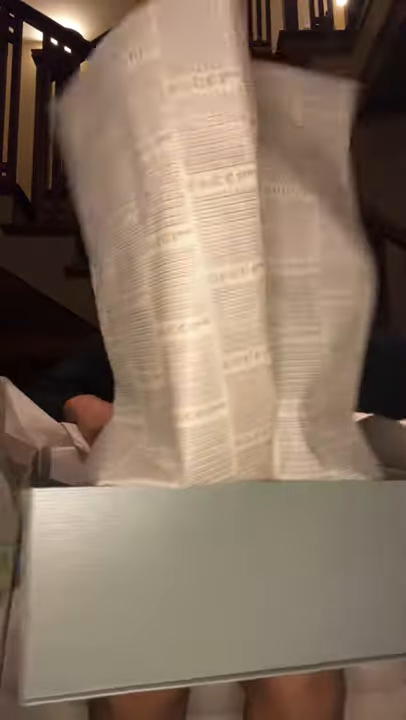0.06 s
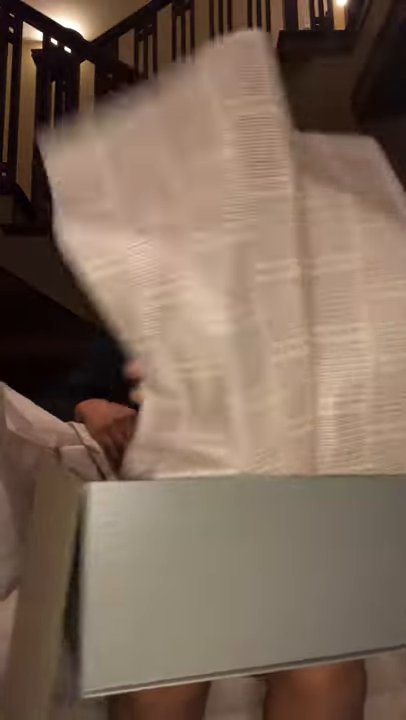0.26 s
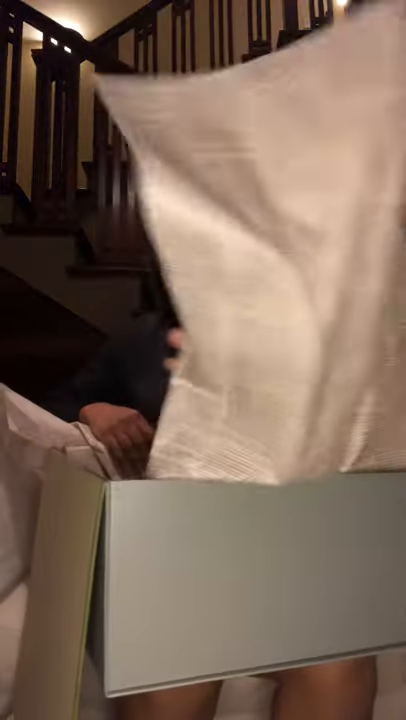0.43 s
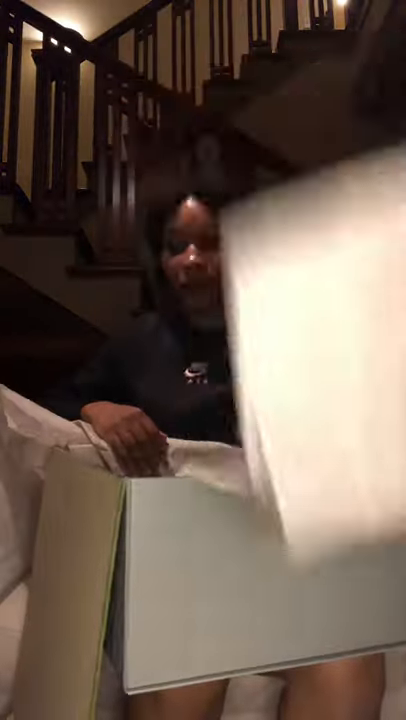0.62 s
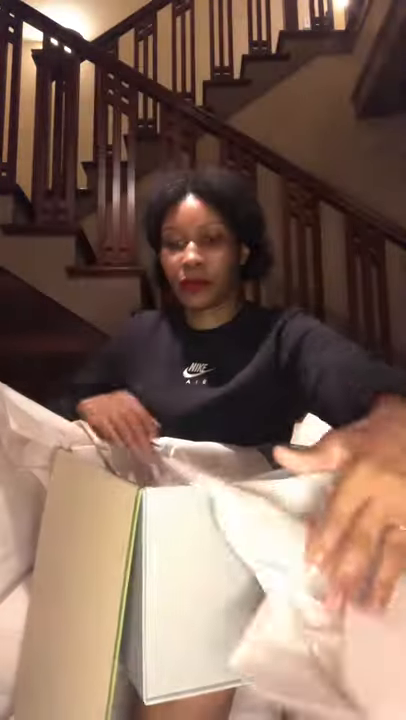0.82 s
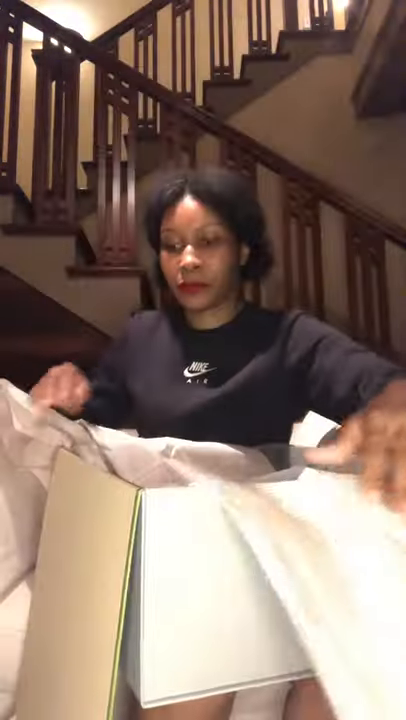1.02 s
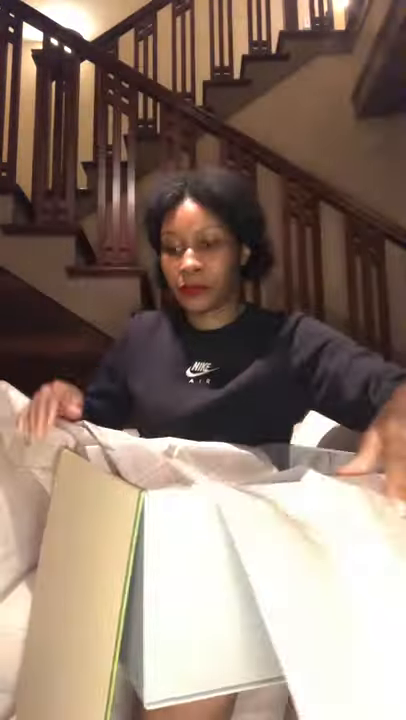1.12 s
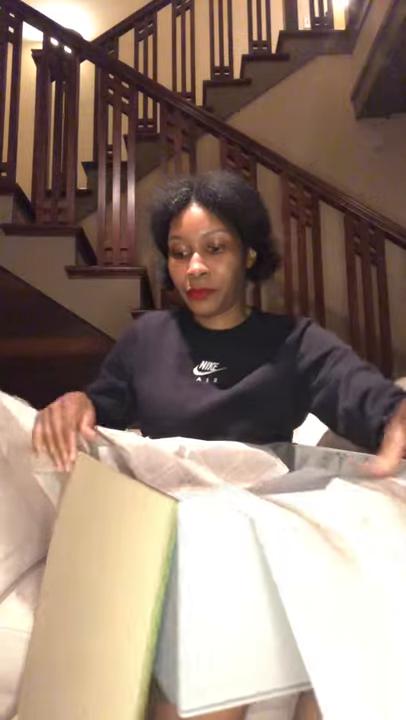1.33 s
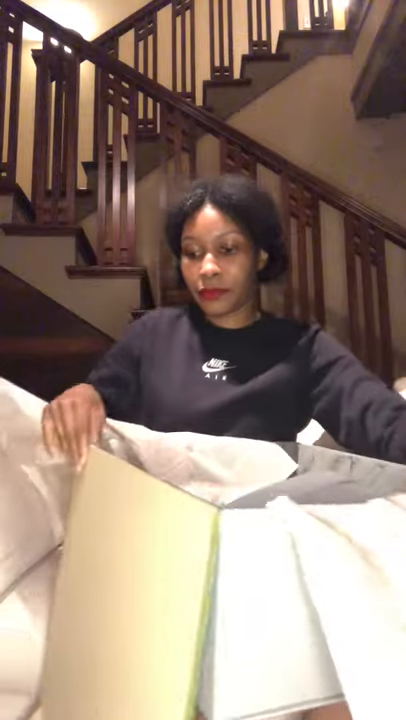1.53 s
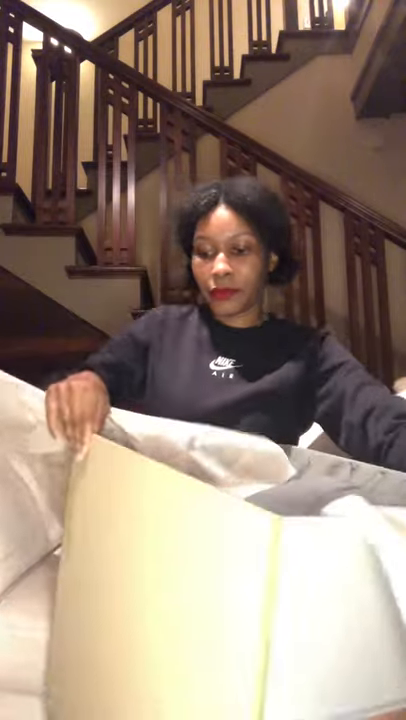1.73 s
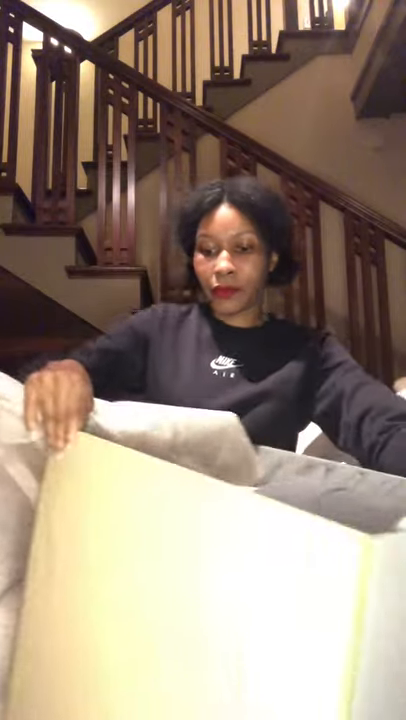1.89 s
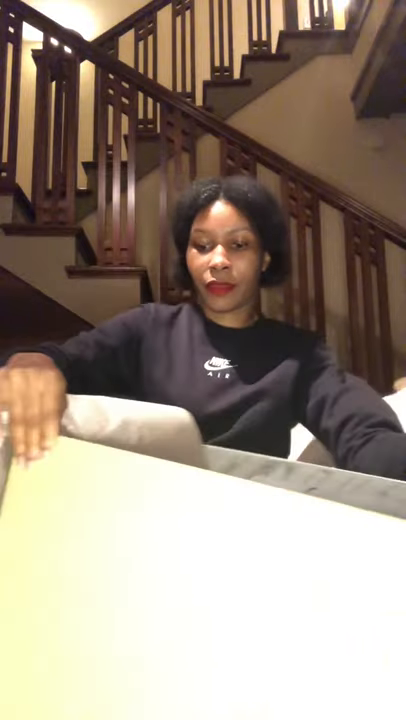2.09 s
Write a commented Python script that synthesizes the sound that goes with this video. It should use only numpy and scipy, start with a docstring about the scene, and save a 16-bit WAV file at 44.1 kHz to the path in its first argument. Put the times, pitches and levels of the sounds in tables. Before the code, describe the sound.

Crisp tissue paper swishes, crackles and snaps while being swept aside, with faint box knocks

```python
"""A sheet of tissue paper is lifted out of a cardboard box, swept aside and pressed down, in a hall.
Sparse creases tick at first and a hand bumps the box as it takes hold of the lid; then the sheet swishes,
its slips drawn as dense random clicks, and crinkles in clumps of tiny buckles while larger creases snap.
Folds pop, fibres tick, knocks return and the flapping pushes a little air, as low noise.
Handling swells again in a second push, then thins out into the quiet noise of the room."""
import sys
import numpy as np
from scipy import signal
from scipy.fft import rfft, irfft
from scipy.io import wavfile

SR = 44100
rng = np.random.default_rng(int(sys.argv[2]) if len(sys.argv) > 2 else 0)


def dump_mix(stems):
    """Bounce the given channels to the path in sys.argv[1] as a 16-bit WAV at rate SR."""
    frames = np.atleast_2d(stems).T  # one column per channel
    limited = np.clip(frames, -1, 1)  # hard clip at full scale
    pcm = np.round(limited * 32767).astype(np.int16)
    wavfile.write(sys.argv[1], SR, pcm)


N = 94815

USUAL_DB = -43  # handling level at which the slip and buckle rates hold

# Low colour of moved air and of contact with the box: (frequency [Hz], relative level [dB])
AIR_COLOUR = [(20, -55), (30, -46), (40, -39), (52, -17.5), (100, -7), (150, -5.5), (220, 0.5), (350, -1),
              (490, -1), (620, -20), (1500, -22), (6000, -67)]


def amp(db):
    """Decibels to gain."""
    return 10 ** (np.asarray(db) / 20)


def unit(x):
    """Scales to rms 1."""
    return x / np.sqrt(np.mean(x ** 2) + 1e-20)


def read_curve(points, hz):
    """Reads a frequency curve on a log-frequency axis."""
    f, value = np.transpose(points)
    return np.interp(np.log(hz + 1), np.log(f + 1), value)


def handling(column):
    """How strongly the sheet is handled at every sample: column 1 for sliding, 2 for fine crinkle."""
    # Handling of the sheet, before layer trims: (time [s], sliding level [dB], crinkle level [dB])
    gesture = [(0, -52, -56), (0.1, -54, -61), (0.19, -53.5, -65), (0.23, -51, -54), (0.24, -40.5, -41),
               (0.259, -44.5, -40), (0.275, -40, -39.5), (0.345, -40.5, -43.5), (0.405, -45, -46.5),
               (0.44, -42.5, -45), (0.474, -44.5, -48), (0.497, -38, -49.5), (0.531, -46, -47.5),
               (0.59, -42, -44), (0.685, -47.5, -47.5), (0.755, -40.5, -44), (0.781, -38.5, -35.5),
               (0.825, -36.5, -31), (0.859, -44, -38.5), (0.901, -47, -44.5), (0.938, -38.5, -34),
               (0.968, -43.5, -41.5), (1.013, -43.5, -38), (1.04, -45.5, -49.5), (1.11, -48.5, -48.5),
               (1.135, -47, -50.5), (1.165, -43, -44), (1.3, -45, -46.5), (1.435, -44, -45.5),
               (1.479, -40, -42.5), (1.57, -38, -35.5), (1.651, -48.5, -52.5), (1.7, -49, -49),
               (1.769, -47.5, -44), (1.81, -49, -47.5), (1.89, -53, -53.5), (1.95, -54.5, -58),
               (2.019, -62.5, -66.5), (2.09, -55.5, -58), (2.15, -56.5, -61)]
    rows = np.array(gesture)
    return np.interp(np.arange(N) / SR, rows[:, 0], rows[:, column])


def mix_in(mix, s, sound):
    """Adds a sound to the mix at a time in seconds."""
    part = mix[max(0, round(s * SR)):][:len(sound)]
    part += sound[:len(part)]


def colour(x, points, size=8192):
    """Causal minimum-phase filter with the given spectrum and unit energy."""
    hz = abs(np.fft.fftfreq(size, 1 / SR))
    log_gain = np.log(amp(read_curve(points, hz)))
    spectrum = np.exp(np.conj(signal.hilbert(log_gain)))
    taps = np.fft.ifft(spectrum).real[:size // 2]
    return signal.fftconvolve(x, taps / np.linalg.norm(taps))[:N]


def wander(rate_hz):
    """Smooth random drift, mostly slower than the given rate, at rms 1."""
    hz = np.fft.rfftfreq(N, 1 / SR)
    slow = rfft(rng.standard_normal(N)) / (1 + (hz / rate_hz) ** 4)
    return unit(irfft(slow, N))


def clicks(rate, spread_db, largest=3.2):
    """Random clicks of uneven size and either sign, as strong on average where sparse as where dense."""
    excess = np.minimum(rng.exponential(1, N), largest)
    size = amp(spread_db * excess) * rng.choice([-1., 1.], N)
    happens = rng.random(N) < rate / SR
    return unit(size * happens / np.sqrt(rate))


def swish(clump_db=2.2, clump_hz=70, hiss_db=-12, tilt_db=2.0, pivot_hz=2100):
    """Paper slides on paper in countless slips, duller or brighter as the contact moves, fewer when gentle."""
    # Colour of sliding paper: (frequency [Hz], relative level [dB])
    slide_colour = [(100, -28), (450, -15.5), (650, -10.5), (1050, -8.5), (1280, -0.5), (1900, 0),
                    (2550, 1), (3000, -3), (5000, -8.5), (8000, -12.5), (16000, -42)]
    slips_per_s, spread_db, growth, trim_db = 4500, 3, .35, -2  # rate at the usual level
    level = handling(column=1)
    rate = slips_per_s * amp(growth * (level - USUAL_DB)) ** 2
    slips = unit(clicks(rate, spread_db) + amp(hiss_db) * rng.standard_normal(N))
    gain = amp(trim_db + level + clump_db * wander(clump_hz))
    sliding = colour(slips * gain, slide_colour)
    low_pass = signal.butter(2, pivot_hz, fs=SR, output="sos")
    dull = signal.sosfiltfilt(low_pass, sliding)
    bright = sliding - dull
    tilt = amp(tilt_db * wander(clump_hz))
    return dull / tilt + bright * tilt


def folds(count=24, size=600):
    """Larger folds of many sizes pop and ring for a few cycles, each at its own pitch, as the sheet moves."""
    folds_per_s, spread_db, trim_db = 420, 4, -9.5  # rate of all folds together
    low_hz, high_hz, cycles = 1240, 7730, 2.94
    t, pops = np.arange(size) / SR, np.zeros(N)
    for place in (np.arange(count) + rng.random(count)) / count:
        hz = low_hz * (high_hz / low_hz) ** (place ** 1.424)  # leans towards low pitches
        age = t * hz / cycles
        pop = np.sin(2 * np.pi * hz * t) * age * np.exp(-2 * age)
        pop /= np.linalg.norm(pop)
        strikes = clicks(folds_per_s / count, spread_db, largest=2.05)
        pops += signal.fftconvolve(strikes, pop)[:N]
    return unit(pops) * amp(trim_db + handling(column=1))


def buckle(size=200):
    """One tiny buckle: a noisy flutter that swells and dies in about a millisecond."""
    age = np.arange(size) / SR / 0.00027  # the swell peaks after 0.27 ms
    flutter = rng.standard_normal(size) * age * np.exp(-age)
    return flutter / np.linalg.norm(flutter)


def crinkle(clump_db=2.0, clump_hz=110, fizz_db=-7, count=12):
    """Many facets of the sheet buckle in clumps over a fine fizz; harder handling brings more buckles."""
    # Colour of fine crinkling: (frequency [Hz], relative level [dB])
    crinkle_colour = [(200, -25), (950, -21), (1400, -5), (3000, -4.5), (5500, -1), (7700, 0), (8500, -4.5),
                      (12000, -6), (16000, -15.5)]
    buckles_per_s, spread_db, growth, trim_db = 1200, 3.5, .55, -0.5  # rate at the usual level
    level = handling(column=2)
    rate = buckles_per_s * amp(growth * (level - USUAL_DB)) ** 2 / count
    facets = np.zeros(N)
    for _ in range(count):  # each group of facets has its own flutter
        facets += np.convolve(clicks(rate, spread_db), buckle())[:N]
    grains = unit(unit(facets) + amp(fizz_db) * rng.standard_normal(N))
    gain = amp(trim_db + level + clump_db * wander(clump_hz))
    return colour(grains * gain, crinkle_colour)


def fibres():
    """Single fibres give sparse, needle-fine ticks at the very top, riding on the crinkle."""
    # Colour of a fibre tick: (frequency [Hz], relative level [dB])
    fibre_colour = [(1500, -49), (5000, -11), (8500, -6), (12000, -1.5), (16000, -4)]
    fibres_per_s, spread_db, trim_db = 110, 5, -12.5
    ticks = clicks(fibres_per_s, spread_db, largest=1.9)
    return colour(ticks * amp(trim_db + handling(column=2)), fibre_colour)


def flap(gust_db=1.0, gust_hz=30):
    """The moving sheet pushes air and drums softly on the box: low noise in uneven gusts."""
    # Low flutter of the sheet: (time [s], level [dB])
    flutter_level = [(0, -61), (.1, -60.5), (.2, -67), (.27, -50), (.35, -56), (.45, -53.5), (.68, -56),
                     (.82, -48), (.9, -58), (1.0, -55), (1.12, -58.5), (1.18, -52.5), (1.38, -57),
                     (1.48, -51.5), (1.62, -51.5), (1.7, -59), (1.79, -54), (1.9, -67), (2.15, -64.5)]
    level = np.interp(np.arange(N) / SR, *np.transpose(flutter_level)) + gust_db * wander(gust_hz)
    return colour(rng.standard_normal(N) * amp(level), AIR_COLOUR)


def room_noise(level_db=-62.5):
    """Steady, quiet noise of the room, weighted to the lows."""
    # Colour of the room: (frequency [Hz], relative level [dB])
    room_colour = [(20, -53), (30, -31), (40, -28), (55, -2), (200, -5.5), (450, -15.5), (700, -8),
                   (2000, -16.5), (16000, -28)]
    return amp(level_db) * colour(rng.standard_normal(N), room_colour)


def snaps(spike_db=4.5, width=0.52, ring=0.89, size=1000):
    """A crease gives way in a run of sharp ticks lasting milliseconds, and the facet beside it rings."""
    # Creases that snap through: (time [s], level [dB], length [s], sharp top against that level [dB],
    # ring of the facet against that level [dB], facet pitch [Hz]); levels are before the trims below
    creases = [(0.015, -48.5, 0.0012, -8, 4.5, 3700), (0.0406, -37.5, 0.0026, -3, -9.5, 2290),
               (0.062, -49, 0.003, -4, -9, 1270), (0.083, -49, 0.001, 4, -12, 3010),
               (0.091, -43.5, 0.0028, -7, -1, 4200), (0.0982, -45.5, 0.00061, 2, 2, 1760),
               (0.113, -46.5, 0.0018, -8, 0, 1290), (0.135, -51, 0.003, -3, 4, 2110),
               (0.163, -51, 0.0015, -5, 0, 4000), (0.196, -51, 0.00081, 3, -8, 2490),
               (0.213, -49.5, 0.003, -5, 2.5, 2680), (0.2265, -52, 0.00082, 5, -15, 2500),
               (0.2353, -41, 0.0015, 5.5, -9, 2070), (0.266, -29.5, 0.0031, -2, -17, 3570),
               (0.279, -31, 0.0018, -4, -4.5, 2250), (0.307, -32, 0.001, -5, -14, 2090),
               (0.315, -36.5, 0.0027, 2, -10, 2340), (0.323, -38.5, 0.0028, 0, -1, 1810),
               (0.331, -34.5, 0.001, 1, -10, 4070), (0.3508, -30.5, 0.001, -14, -1.5, 2000),
               (0.3548, -37, 0.002, 4, -4, 1440), (0.3626, -34, 0.0012, 5.5, -3, 2360),
               (0.421, -36, 0.0015, 5.5, -11, 1380), (0.4402, -32.5, 0.0023, -5, -8, 1730),
               (0.447, -33.5, 0.00089, -0.5, -6, 1980), (0.498, -42, 0.0069, -2, 2.5, 2290),
               (0.5905, -38.5, 0.0021, 3, -7, 1970), (0.649, -38.5, 0.0041, -10, -3, 1360),
               (0.6585, -37.5, 0.001, 2, -8, 4050), (0.695, -41, 0.0019, 2, -7, 3970),
               (0.7184, -33.5, 0.0016, -1, -5, 1600), (0.7251, -36, 0.0013, 1, -2, 3900),
               (0.737, -38.5, 0.003, 1, 5.5, 2450), (0.7555, -39, 0.002, 0, -7, 3000),
               (0.7712, -33.5, 0.0018, -6, -1, 4460), (0.7744, -32, 0.00082, -3, -9, 1710),
               (0.811, -34, 0.002, -1, -12, 3830), (0.845, -33.5, 0.0029, -14, -10, 3250),
               (0.877, -37, 0.004, -14, -1.5, 1800), (0.911, -33, 0.001, -3, -17, 1830),
               (0.933, -30.5, 0.0021, 1, -9, 2480), (1.018, -37.5, 0.0035, -9, -4.5, 1420),
               (1.054, -32.5, 0.0035, -11, -6.5, 1430), (1.072, -39.5, 0.0057, -10, -1.5, 2480),
               (1.101, -34, 0.0013, -18, -4, 2300), (1.1093, -37, 0.0064, -7, -4.5, 2180),
               (1.259, -41.5, 0.0055, 1.5, -13, 4290), (1.417, -42.5, 0.0015, 0, 4.5, 2060),
               (1.437, -38, 0.0013, -3, -6, 2600), (1.4706, -28.5, 0.0013, -3, -5, 2440),
               (1.4813, -33.5, 0.0057, -1, -3, 2550), (1.508, -33.5, 0.001, 1, -10, 3490),
               (1.5226, -33, 0.0015, -1, -9, 2130), (1.552, -34, 0.0018, 1, -6, 2400),
               (1.619, -37.5, 0.0011, -9, -5, 2310), (1.7177, -41, 0.0028, -13, -5, 2160),
               (1.767, -40, 0.0067, -1, -9, 2240), (1.7927, -37.5, 0.0038, 1, -10, 2050),
               (1.8054, -40.5, 0.0047, 0, -11, 1980), (1.8368, -37, 0.003, 2, -1.5, 2110),
               (1.851, -39, 0.0029, -6, -14, 4200), (1.879, -38, 0.0013, -5, -10, 2240),
               (1.905, -48, 0.00085, -10, -2, 2300), (1.9125, -46.5, 0.0028, -5, -1, 2720),
               (1.989, -46.5, 0.0025, -6, -2, 1720), (2.047, -50, 0.0022, -6, 0, 2400),
               (2.069, -42, 0.0015, -3, -8, 4220), (2.077, -51, 0.001, -8, 0, 2700),
               (2.105, -51, 0.0018, -13, -8, 2610)]
    # Colours of crack, sharp top, flexing body and ringing facet: (frequency [Hz], relative level [dB])
    crack_colour = [(300, -39), (1000, -18), (3000, -1.5), (5000, -1), (7600, 1), (9000, -10),
                    (16000, -22.5)]
    top_colour = [(1000, -50), (6000, -12), (8600, 0.5), (12000, 1.5), (16000, -2.5)]
    body_colour = [(200, -6), (950, -2), (1300, 11.5), (2500, 12), (3500, -6.5), (8000, -22)]
    facet_colour = [(300, -32), (950, -20), (1250, 2), (4500, 0), (16000, -0.5)]
    treble_db, body_db, facet_gain = 1, -3, 0.8
    facet_damping_hz = 375  # decay rate divided by pi

    crack, top, body, facets = np.zeros((4, N))
    t = (np.arange(size) - size // 2) / SR  # centred on the snap
    for s, db, length, top_db, ring_db, hz in creases:
        ticks, fine, sizes, flex = rng.standard_normal((4, size))
        half = width * length
        run = np.exp(-abs(t / half) ** 1.64 / 2)
        swell = np.exp(-abs(t / (ring * half)) ** 1.8 / 2)
        uneven = unit(run * amp(spike_db * sizes))
        spikes = amp(db) * uneven * np.sqrt(np.mean(run ** 2))
        age = np.maximum(t + half, 0) * np.pi * facet_damping_hz
        facet = age * np.exp(-age) * np.sin(2 * np.pi * (hz * t + rng.random()))
        strength = amp(db + ring_db) * np.sqrt(np.mean(swell ** 2))
        start = s + t[0]
        mix_in(crack, start, spikes * np.sign(ticks))
        mix_in(top, start, amp(top_db) * spikes * np.sign(fine))
        mix_in(body, start, strength * unit(swell * flex))
        mix_in(facets, start, strength * unit(facet))
    treble = amp(treble_db) * (colour(crack, crack_colour) + colour(top, top_colour))
    flexing = amp(body_db) * colour(body, body_colour)
    return treble + flexing + facet_gain * colour(facets, facet_colour)


def bumps(size=4000):
    """A short push knocks a cardboard panel, which gives a damped thud with a dull scuff."""
    # Knocks of hand and sheet on the box: (time [s], level [dB], pitch [Hz], decay [s])
    knocks = [(.096, -46.5, 152, 0.011), (.343, -47, 130, 0.029), (.493, -45, 440, 0.024),
              (1.451, -47, 308, .008), (1.487, -44.5, 255, 0.012), (1.5, -45, 129.4, 0.022),
              (1.59, -47, 149, 0.011), (1.623, -49, 225, .026), (1.644, -46, 310, 0.011),
              (1.655, -49, 188, 0.014), (1.716, -41, 484, 0.0052), (1.73, -43, 164, .012),
              (1.849, -44.5, 381, 0.013), (1.859, -51, 164, 0.0088)]
    rise_s, scuff_gain, contact_s, contact_db = 0.0014, .3, 0.00072, 0.5
    thuds, contacts = np.zeros((2, N))
    t = np.arange(size) / SR
    age = t / contact_s
    push = amp(contact_db) * age * (1 - age / 2) * np.exp(-age)
    for s, db, hz, decay in knocks:
        shape = np.minimum(t / rise_s, 1) * np.exp(-t / decay)
        scuff = scuff_gain * shape * rng.standard_normal(size)
        mix_in(thuds, s, amp(db) * shape * np.sin(2 * np.pi * hz * t))
        mix_in(contacts, s, amp(db) * (push + scuff))
    return thuds + colour(contacts, AIR_COLOUR)


def echo(size=22050):
    """Quick reflections off the box, then the short tail of the hall, for one position of the sheet."""
    # Reverberation of the hall: (frequency [Hz], time to fall 60 dB [s])
    hall_decay = [(100, 0.55), (1500, 0.68), (6000, 0.49), (16000, 0.15)]
    tail_db, early_db, early_decay_s = -12.5, -8.5, 0.0057
    t = np.arange(size) / SR
    reflections = rng.standard_normal(size) * (rng.random(size) < 2000 / SR)  # about 2000 per second
    early = reflections * (t > .001) * np.exp(-t / early_decay_s)
    late_noise = rng.standard_normal(size) * (t > .007)
    hz, at, bands = signal.stft(late_noise, SR, nperseg=256)
    fade = amp(-60 * at / read_curve(hall_decay, hz)[:, None])  # each band dies at its own pace
    tail = signal.istft(bands * fade, SR, nperseg=256)[1][:size]
    return amp(early_db) * early / np.linalg.norm(early) + amp(tail_db) * tail / np.linalg.norm(tail)


def hall(x, count=6):
    """The sounding spot drifts about the sheet, so its reflections keep blending between several echoes."""
    shares = np.array([wander(32.8) for _ in range(count)])
    shares /= np.linalg.norm(shares, axis=0)  # constant total power
    return x + sum(signal.fftconvolve(x * share, echo())[:N] for share in shares)


def scene():
    """Paper and box in the hall, over quiet room noise."""
    floor = room_noise()
    paper = swish() + folds() + crinkle() + fibres() + snaps() + flap()
    return (hall(paper + bumps()) + floor)[None]


def record(dry):
    """Band limit: a steep low-pass takes away the extreme treble."""
    taps = signal.firwin(511, 16150, window=("kaiser", 9), fs=SR)  # cutoff in Hz
    return signal.oaconvolve(dry, taps[None], "same")


dry = scene()
out = record(dry)
dump_mix(out)
```